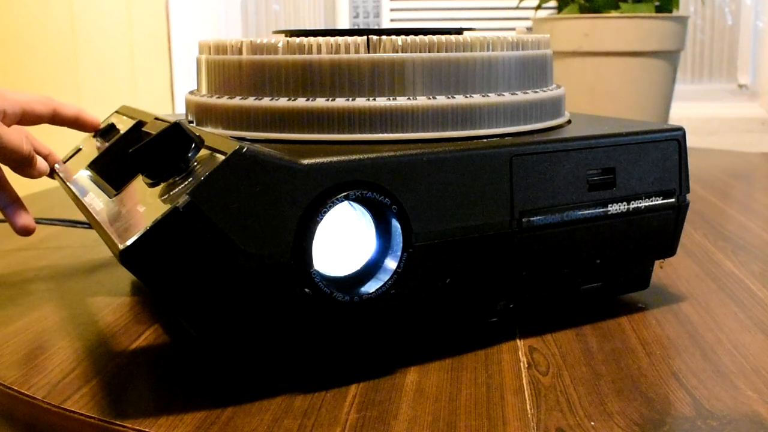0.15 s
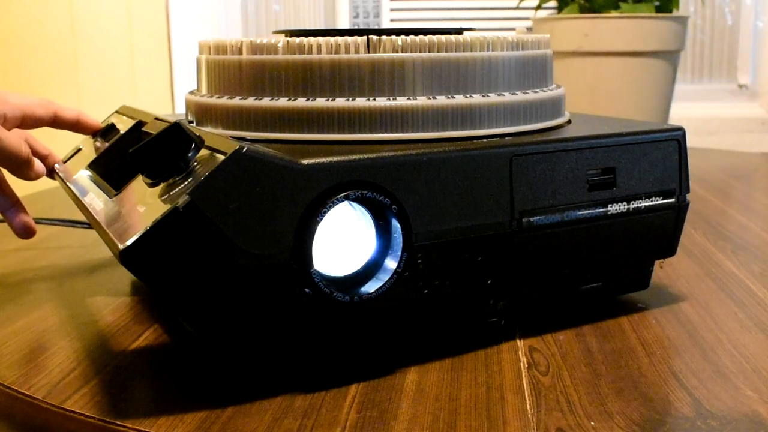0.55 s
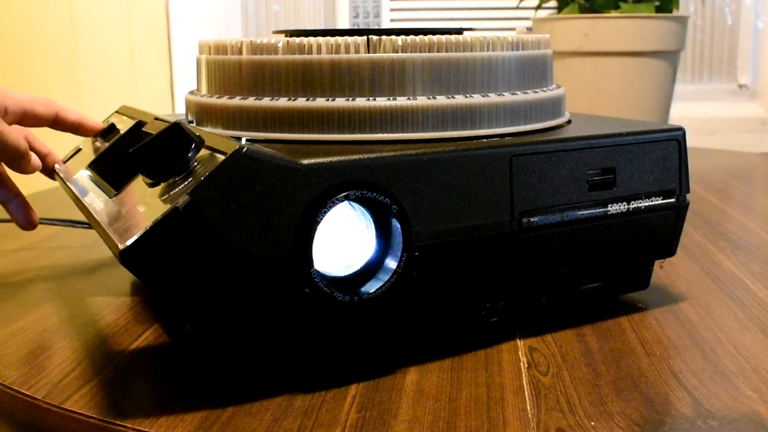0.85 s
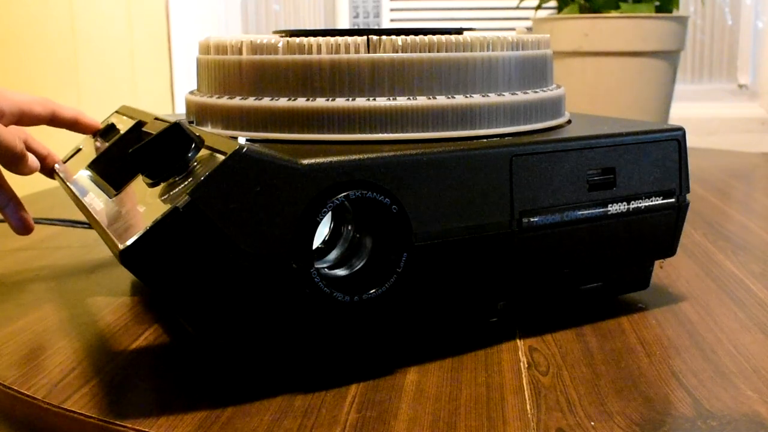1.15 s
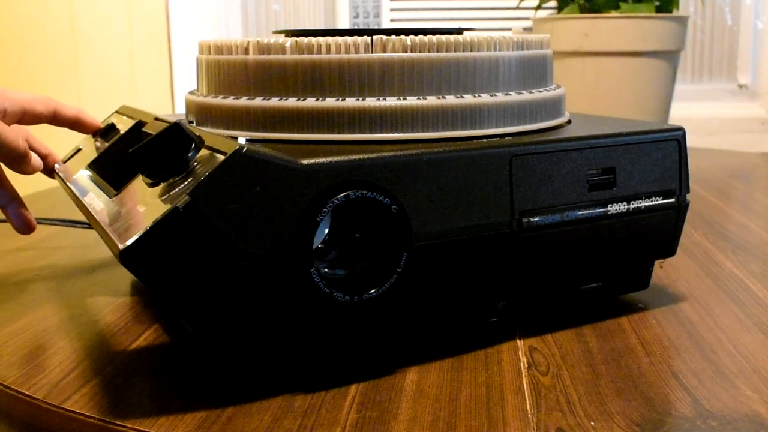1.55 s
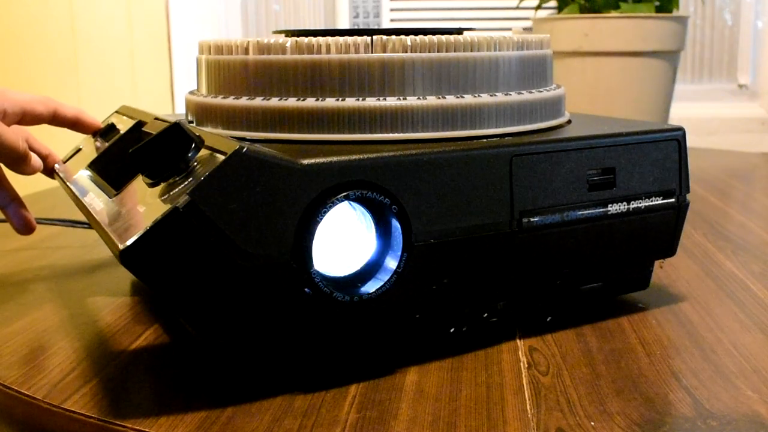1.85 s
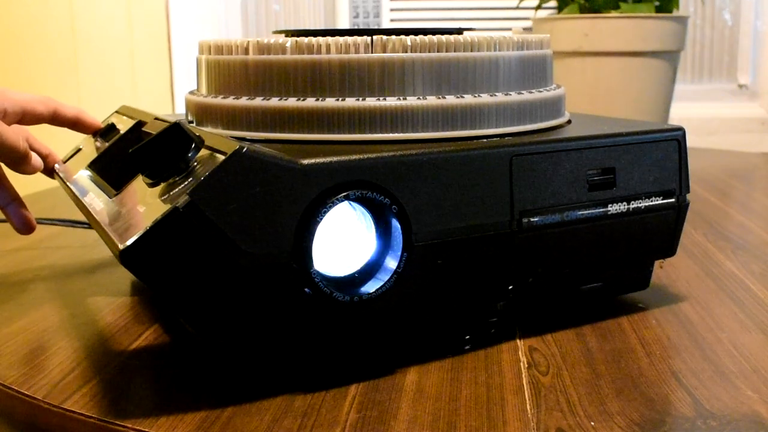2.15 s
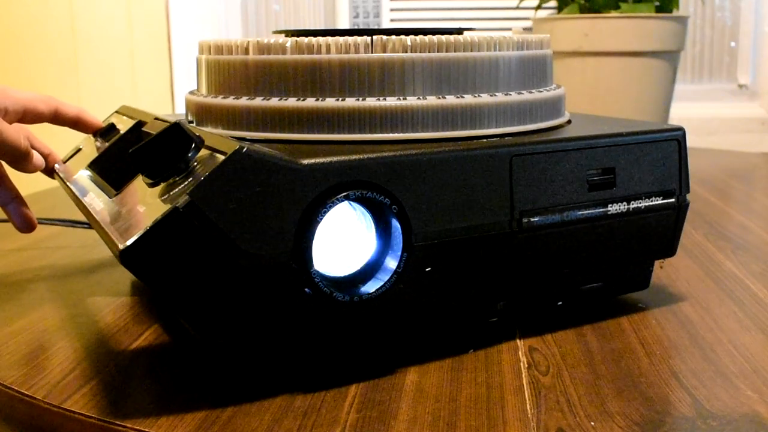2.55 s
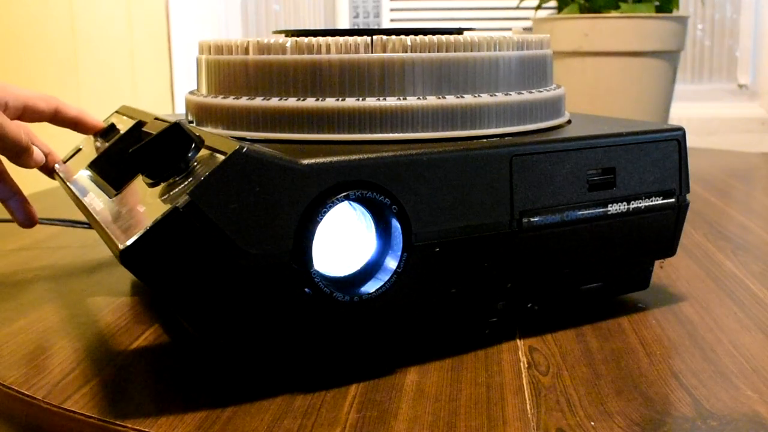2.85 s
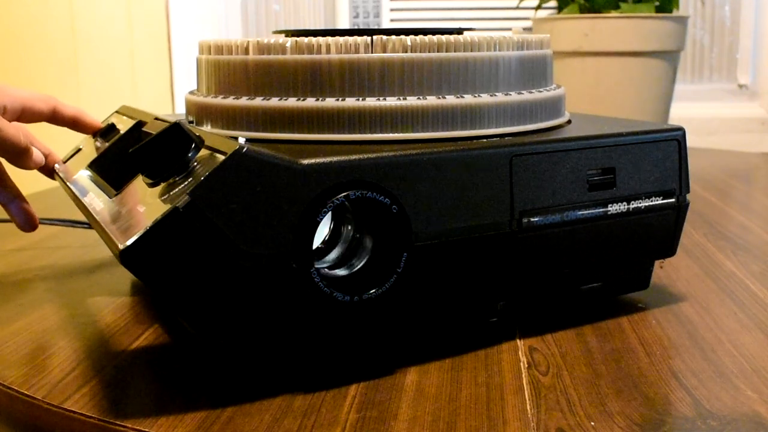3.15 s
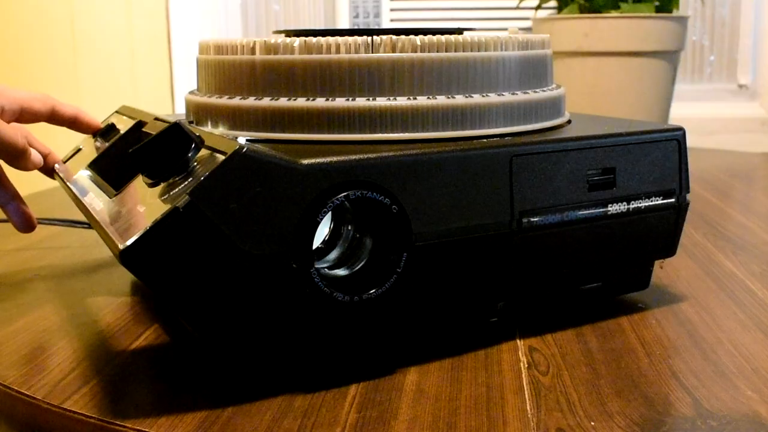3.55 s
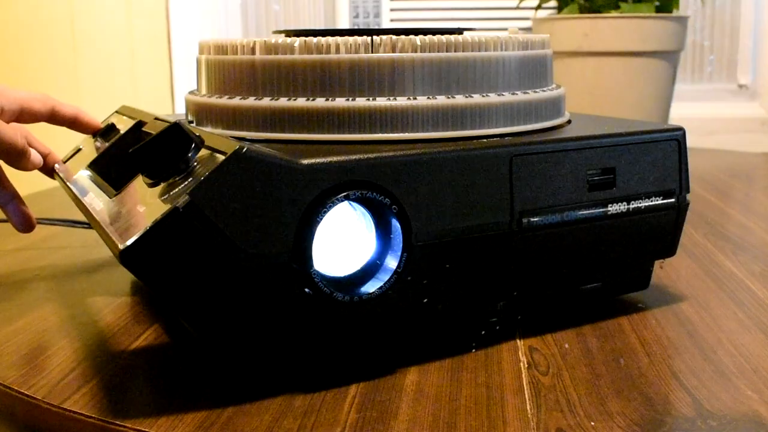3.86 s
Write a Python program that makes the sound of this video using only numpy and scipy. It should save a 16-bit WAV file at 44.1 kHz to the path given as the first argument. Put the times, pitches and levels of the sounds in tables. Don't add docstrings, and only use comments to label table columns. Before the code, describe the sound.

Slide projector changing slides twice, clicking, clunking and snapping above a steady cooling fan

```python
import sys
import numpy as np
from scipy import signal
from scipy.fft import rfft, irfft
from scipy.io import wavfile
from scipy.ndimage import uniform_filter1d

SR = 44100
rng = np.random.default_rng(int(sys.argv[2]) if len(sys.argv) > 2 else 0)


def master_out(mix):
    frames = np.transpose(np.atleast_2d(mix))
    ceiling = np.clip(frames, -1, 1)
    pcm = np.round(ceiling * 32767).astype(np.int16)
    wavfile.write(sys.argv[1], SR, pcm)


def amplitude_ratio(level_db):
    exponent = np.asarray(level_db, float) / 20
    return 10 ** exponent


N = 176400

# f/Hz, level/dB, t60/s (time to fall 60 dB)
CLUTCH_MODES = [(1210, 5, 0.02), (1710, 4.5, 0.02), (2170, -5, 0.03), (3100, -2, 0.015)]


def at_hz(points, hz):
    f, value = np.array(points).T
    return np.interp(np.log(hz + 1), np.log(f), value)


def rms_one(x):
    return x / np.sqrt(np.mean(x ** 2) + 1e-20)


def drift(rate_hz):
    r = np.exp(-2 * np.pi * rate_hz * 40 / SR)
    noise = rng.standard_normal(N // 40 + 2002)
    slow = signal.lfilter([1], [1, -2 * r, r * r], noise)[2000:]
    return np.interp(np.arange(N) / 40, np.arange(len(slow)), rms_one(slow))


def causal(db):
    cepstrum = irfft(db * np.log(10) / 20, N)
    cepstrum[1:N // 2] *= 2
    cepstrum[N // 2 + 1:] = 0
    return np.exp(rfft(cepstrum))


def ring(drive, hz, t60):
    r = amplitude_ratio(-60 / (t60 * SR))
    w = 2 * np.pi * hz / SR
    return signal.lfilter([0, np.sin(w)], [1, -2 * r * np.cos(w), r * r], drive[:N] + 1e-18)


def rattle(t60):
    clicks_per_s, rise_s, spread_db = 11000, 0.0004, 3.5
    snap_db, snap_t60 = -2.5, 0.0079
    t = np.arange(8000) / SR
    sizes = amplitude_ratio(spread_db * np.minimum(rng.exponential(1, len(t)), 3))
    sizes = sizes * rng.choice([-1, 1], len(t))
    clicks = rms_one(sizes * (rng.random(len(t)) < clicks_per_s / SR))
    shape = amplitude_ratio(-60 * t / t60) + amplitude_ratio(snap_db - 60 * t / snap_t60)
    return clicks * (1 - np.exp(-t / rise_s)) * shape


def contacts(hits, part_modes, t60, thump_hz):
    # f/Hz, level/dB, t60/s
    housing_modes = [(362, 1, .08), (450, -6, .04), (560, 1, .06), (700, -6, .035), (755, 2, .065),
                     (880, -2, .045), (985, -4, .025), (1200, -2, .035)]
    crack_db, thump_db, ring_db = -7, -12.5, -4.5
    focus_db = 28
    scatter_db = 1.53
    buzz_db, buzz_hz, longest_t60 = 2.2, 55, 0.085

    modes = np.array(housing_modes + part_modes)
    mode_hz, mode_db, mode_t60 = modes.T
    is_housing = np.arange(len(modes)) < len(housing_modes)
    focus = focus_db * np.log2(mode_hz / thump_hz) ** 2
    drive = np.zeros((2 + len(modes), N + 8000))
    for s, hit_db, sizzle_re, thump_re, ring_re in hits:
        burst = rattle(t60)
        content = np.abs(rfft(burst[:500], 4410))[(mode_hz / 10).astype(int)]
        push_db = 10 * np.log10(content ** 2 + np.sum(burst ** 2) / 10)
        levels = np.where(is_housing, thump_re + thump_db - focus, ring_re + ring_db)
        levels = levels + mode_db + scatter_db * rng.standard_normal(len(modes)) - push_db
        gains = amplitude_ratio(hit_db + np.r_[crack_db, crack_db + sizzle_re, levels])
        start = int(s * SR)
        drive[:, start:start + len(burst)] += gains[:, None] * burst
    rings = np.zeros(N)
    for row, hz, decay in zip(drive[2:], mode_hz, mode_t60):
        rings += ring(row, hz, min(decay, longest_t60)) * amplitude_ratio(buzz_db * drift(buzz_hz))
    return np.array([drive[0, :N], drive[1, :N], rings])


def tray_index():
    hits = [(1.3944, -39, 10, -12, -18), (1.4059, -23.5, -12, -10, -9), (1.4275, -20, -27, -13, -4),
            (1.4355, -21.5, 4, -32, 4), (1.4435, -4.5, 2, -44, -3.5), (1.4573, -22, -11, -34, 7),
            (1.483, -25, -5, -17, -1), (3.5168, -35, 2, -10, -14), (3.5287, -23.5, -19, -26, -9),
            (3.5505, -23.5, -21, -20, 3.5), (3.5593, -20.5, 0, -32, -0.5), (3.5671, -5, 4.5, -15, 0),
            (3.5794, -27, -9, -27, 10), (3.588, -27, -9, -20, 7), (3.6074, -19, -11, -4, -20)]
    modes = [(1450, -7, .02), (1668, 0, .045), (1950, -7, .02), (2265, -6, .035), (2370, -6, .035),
             (2462, 3, .05), (2595, -10, .03)]
    return contacts(hits, modes, t60=0.058, thump_hz=1090)


def key_and_clutch():
    hits = [
        (0.827, -18.5, 3.5, -2, -38),
        (0.8319, -16.5, -7, -39, -7.5),
        (0.8427, -14.5, -22, -4.5, -13.5),
        (0.8579, -21, -3, -6, -11),
        (0.89, -20, -12, -27, -9),
        (2.9351, -18.5, 3, -37, -35),
        (2.9424, -15, -23, -32, -11.5),
        (2.9527, -11, -27, -11.5, -15.5),
        (2.9614, -17.5, -28, 1.5, -10.5),
        (3.0133, -21, -13, -16, -15),
    ]
    return contacts(hits, CLUTCH_MODES, t60=0.067, thump_hz=1050)


def base_knock():
    hits = [
        (0.8644, -23.5, -15, 12, -3),
        (0.878, -39, -15, 9.2, 8),
    ]
    return contacts(hits, CLUTCH_MODES, t60=0.039, thump_hz=360)


def lifter():
    hits = [(0.97, -31.5, -23, 9, -8), (1.0384, -12, -7, -3, -9.5), (1.0614, -30.5, -18, -1, 12.5),
            (1.0886, -23, -15, -34, -14), (1.1194, -37.5, -17, 4, 15.5), (1.1605, -27.5, -19, 1, -14),
            (1.1714, -32, -17, -14, 14.5), (1.197, -22.5, -32, -13, -9), (1.2095, -35.5, -22, 13.5, 5),
            (1.7641, -27, -14, 6, -14), (3.0944, -34, -27, 4, 7), (3.1607, -13.5, -9, 2, -7.5),
            (3.1725, -23, -14, -4, -10), (3.1844, -34, -18, 15, -15), (3.2071, -22.5, -1, -10, -8),
            (3.2394, -43.5, -16, -5, 15), (3.8838, -25.5, -21, 10.5, -27), (3.8964, -32, -16, -29, -17)]
    modes = [(1650, 0, .04), (2462, -7, .03), (3080, -3, .012)]
    return contacts(hits, modes, t60=0.09, thump_hz=830)


def pawl():
    hits = [
        (0.9078, -20, 1, -24, -7),
        (0.9154, -28.5, -14, -16, -5),
        (1.5594, -10.5, 2, -16, -12.5),
        (1.6362, -13.5, 0.5, -12, -29),
        (3.03, -17.5, -3, -11, -12),
        (3.0374, -33, -16, -15, 3),
        (3.6835, -10.5, 4, -5.5, -29),
        (3.7609, -13, 0.5, -11, -27),
    ]
    modes = [(3900, 0, .018), (4720, 5, .016), (4900, 5, .016)]
    return contacts(hits, modes, t60=0.08, thump_hz=1050)


def slide_seat():
    hits = [
        (1.6651, -15.5, -3, 2, -9),
        (1.6783, -11, -10, -8.5, 1),
        (1.6904, -27, -10, 7, 11),
        (3.7883, -15, -8, 4.5, -1),
        (3.8006, -13.5, -3, -1, 6.5),
        (3.8174, -20, -6, -23, -19),
        (3.8574, -27, -11, 3, -24),
    ]
    modes = [(1790, -10, .018), (1300, -9, .015), (2770, -3, .02), (2890, -1, .024)]
    return contacts(hits, modes, t60=0.053, thump_hz=580)


def lever_rebound():
    hits = [
        (1.5815, -19, -14, -16, 2),
        (1.594, -23.5, -14, -1, 4),
        (3.7037, -19.5, -13, -9, 4.3),
        (3.7165, -26.5, -11, -15, 6.9),
    ]
    modes = [(1270, -5, .015), (1770, -2, .022), (2070, -5, .015), (2230, -4, .02), (2480, -6, .02)]
    return contacts(hits, modes, t60=0.072, thump_hz=835)


def latch():
    hits = [
        (3.2819, -24, -10, -4, -16),
        (3.2934, -26, -30, -7, 5),
        (3.304, -32, -30, -21, 11),
        (3.3194, -26.5, -32, -29, 3),
        (3.3314, -38.5, -23, 0, 12),
    ]
    modes = [(1390, -5, .025), (1660, -3, .03), (2470, 0, .05), (4600, -14, .03)]
    return contacts(hits, modes, t60=0.039, thump_hz=970)


def spring():
    hits = [
        (1.4555, -28, -10, -30, 15),
        (1.7, -30, -10, -30, 15),
        (3.5805, -28, -10, -30, 17),
        (3.612, -34, -10, -30, 17),
        (3.5995, -29, -10, -15, 2),
        (1.6655, -21, -10, 5, -20),
        (3.7885, -25, -10, 10.5, -20),
    ]
    modes = [(1665, 0, .04), (2455, -8, .03)]
    return contacts(hits, modes, t60=0.039, thump_hz=900)


def mechanism():
    # f/Hz, level/dB per Hz
    colour = [(500, -52), (1240, -5.5), (2100, 4), (3940, 2.5), (6020, -1.5), (11100, -2), (16000, -9)]
    split_hz = 9150
    low, high, rings = (tray_index() + key_and_clutch() + base_knock() + lifter() + pawl()
                        + slide_seat() + lever_rebound() + latch() + spring())
    low = signal.sosfilt(signal.butter(2, split_hz, "low", fs=SR, output="sos"), low)
    high = signal.sosfilt(signal.butter(2, split_hz, "high", fs=SR, output="sos"), high)
    answer = causal(at_hz(colour, np.fft.rfftfreq(N, 1 / SR)))
    cracks = irfft(rfft(low - high) * answer, N)
    return cracks, rings


def gears():
    # start t/s, end t/s
    turns = [
        (.83, 1.77),
        (2.94, 3.92),
    ]
    t = np.arange(N) / SR
    turning = sum(1.0 * (t > start) * (t < end) for start, end in turns)
    turning = uniform_filter1d(turning, size=5000)
    band = signal.butter(1, [1000, 3000], "band", fs=SR)
    rub = signal.lfilter(*band, rng.standard_normal(N))
    return amplitude_ratio(-49.5 + drift(38.0)) * turning * rms_one(rub)


def fan():
    # f/Hz, level/dB per Hz
    air_curve = [(15, -80), (25, -55), (273, -13.5), (358, -12.5), (483, -7.5), (1180, -3.5), (1470, -10.5),
                 (10400, -29.5), (16500, -46)]
    # f/Hz, width/Hz, level/dB over the air
    ducts = [(363, 40, 13), (696, 97, 5.9), (874, 85, 6.05), (1260, 56, 1.4), (1776, 180, 7),
             (2220, 220, 3.5), (3000, 590, 5.5), (3900, 74, 8.3)]
    # f/Hz, level/dB rms
    tone_list = [(240, -66.5), (360.7, -62), (721.4, -53.5), (1055, -67), (1174, -51.5), (1577, -61),
                 (2347, -61)]
    air_db, gust_db, gust_hz = -41.5, 1.7, 0.83
    wobble_db, wobble_hz = 3, 11.0
    sway_rad, sway_hz = 1.3, 2.06

    hz = np.fft.rfftfreq(N, 1 / SR)
    t = np.arange(N) / SR
    db = at_hz(air_curve, hz)
    for f, width, top_db in ducts:
        db = db + top_db / (1 + (2 * (hz - f) / width) ** 2)
    air = rms_one(irfft(rfft(rng.standard_normal(N)) * amplitude_ratio(db), N))
    tones = np.zeros(N)
    for f, tone_db in tone_list:
        level = amplitude_ratio(tone_db + 2.0 + wobble_db * drift(wobble_hz))
        tones += level * np.sin(2 * np.pi * f * t + sway_rad * drift(sway_hz))
    return amplitude_ratio(air_db + gust_db * drift(gust_hz)) * air + tones


def room(x):
    # f/Hz, t60/s
    decay = [(300, 0.29), (2000, 0.33), (6000, 0.17), (15000, 0.16)]
    t = np.arange(SR // 2) / SR
    edges = 125 * 2 ** np.arange(8)
    tail = np.zeros(len(t))
    for low, high in zip(edges, edges[1:]):
        band = signal.butter(2, [low, high], "band", fs=SR, output="sos")
        noise = signal.sosfilt(band, rng.standard_normal(len(t)))
        tail += noise * amplitude_ratio(-60 * t / at_hz(decay, np.sqrt(low * high)))
    tail = tail * (t > 0.00366)
    return signal.fftconvolve(x, tail / np.sqrt(np.sum(tail ** 2)))[:N]


def scene():
    air, rub = fan(), gears()
    cracks, rings = mechanism()
    wet = amplitude_ratio(-7.5) * room(rub + cracks + amplitude_ratio(-6) * rings)
    mic = signal.butter(6, 362, "high", fs=SR, output="sos")
    parts = signal.sosfilt(mic, rub + cracks + rings + wet)
    return (parts + air)[None]


def roll_off(x):
    return signal.sosfilt(signal.butter(12, 16810, fs=SR, output="sos"), x)


def record(dry):
    bent = dry + 0.012 * (dry ** 2 - np.mean(dry ** 2))
    top_cut = signal.cheby2(12, 60, 16800, fs=SR, output="sos")
    mix = signal.sosfilt(top_cut, np.clip(bent, -1, 1))
    return roll_off(mix)


dry = scene()
out = record(dry)
master_out(out)
```